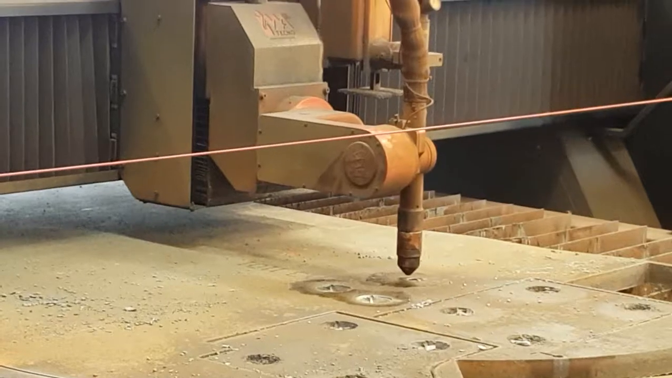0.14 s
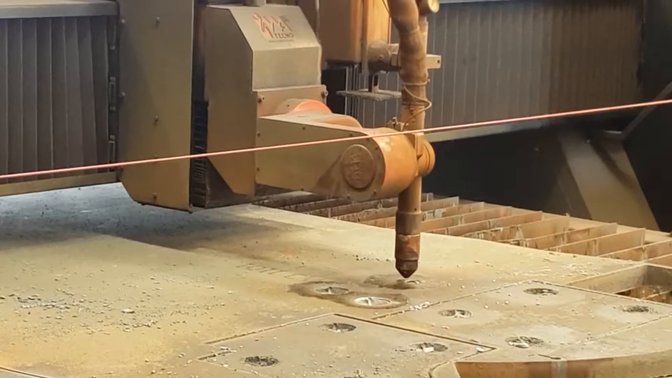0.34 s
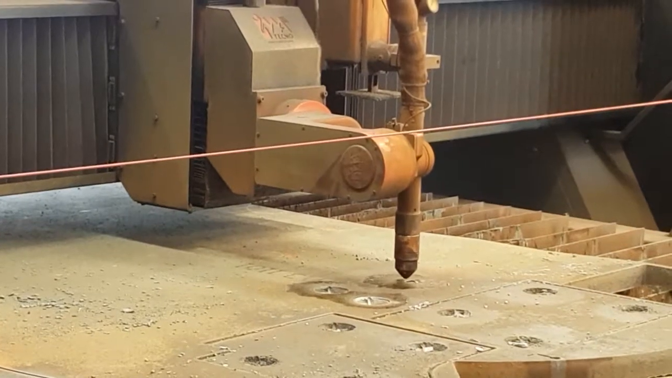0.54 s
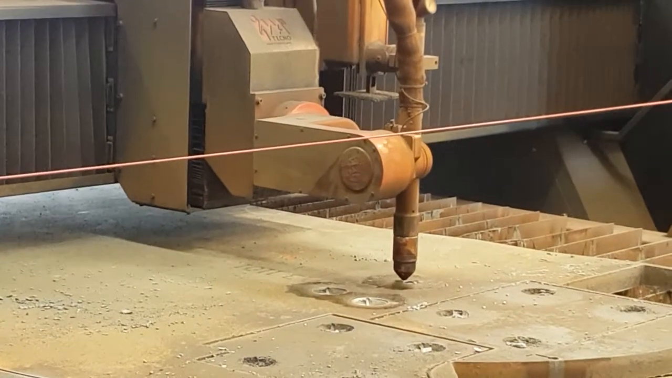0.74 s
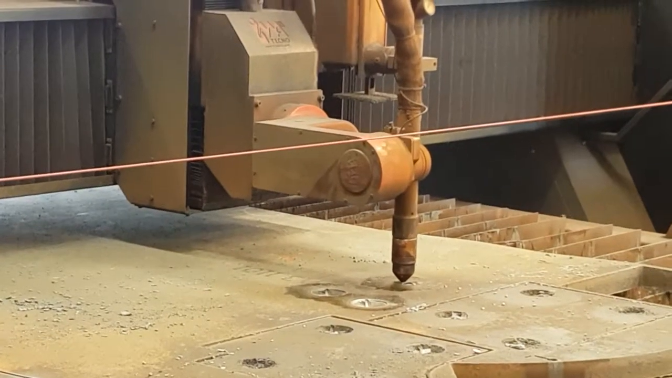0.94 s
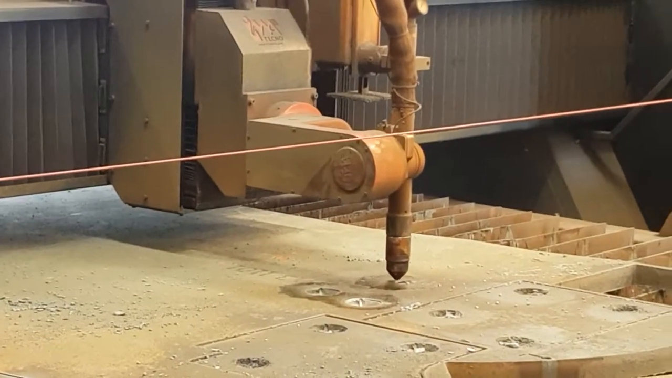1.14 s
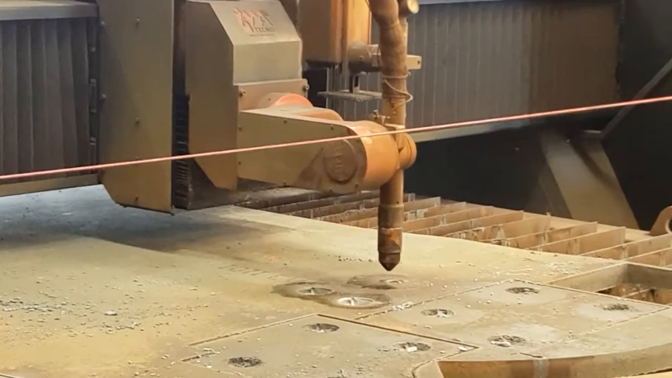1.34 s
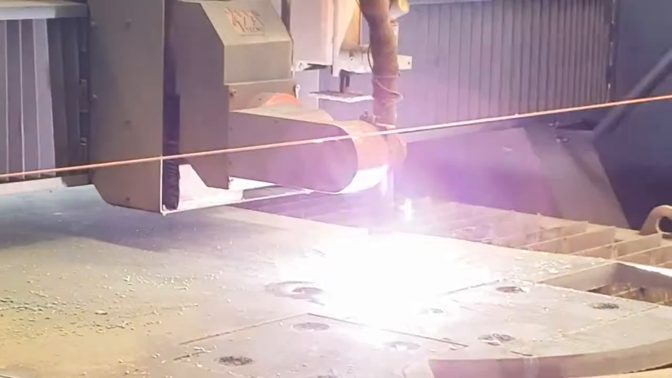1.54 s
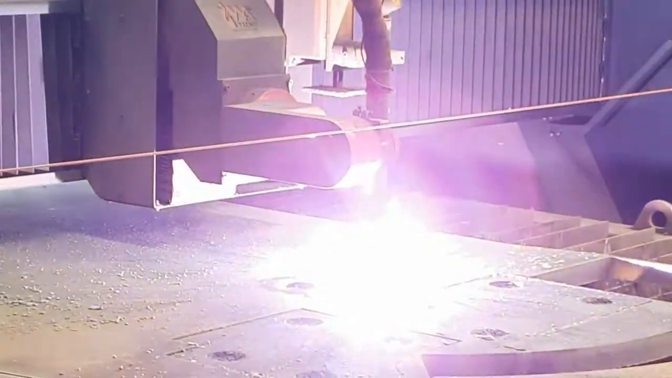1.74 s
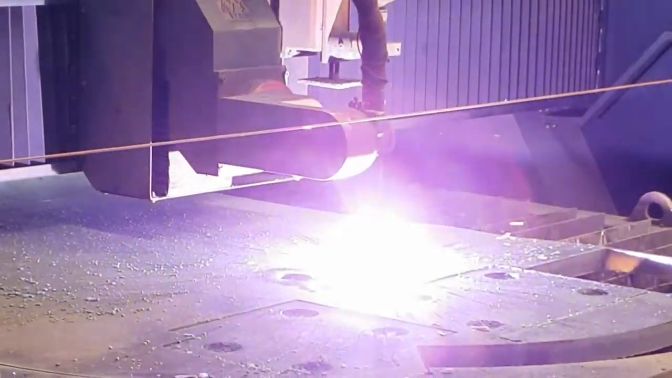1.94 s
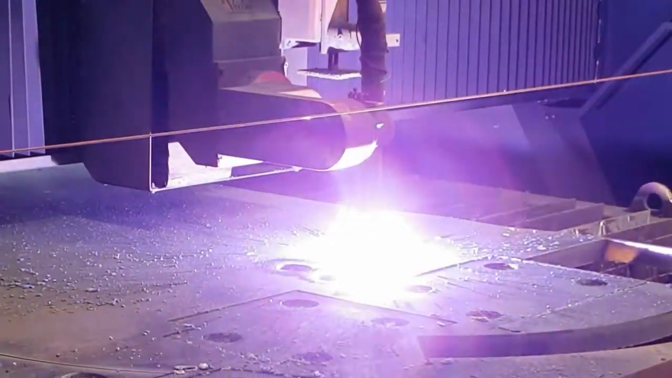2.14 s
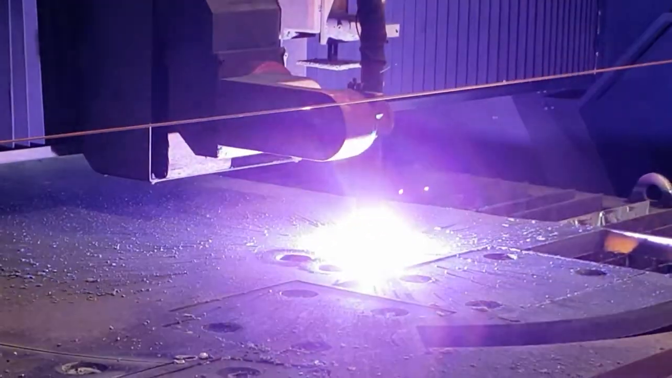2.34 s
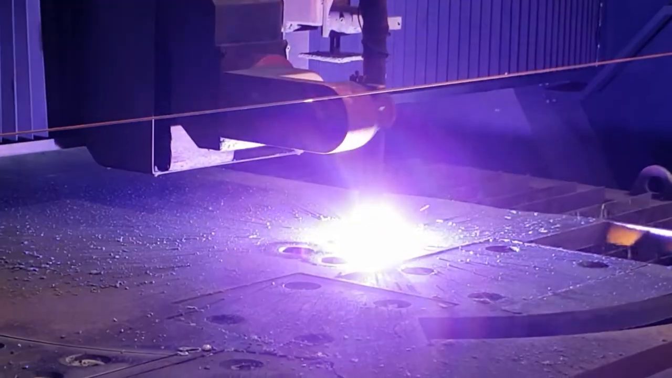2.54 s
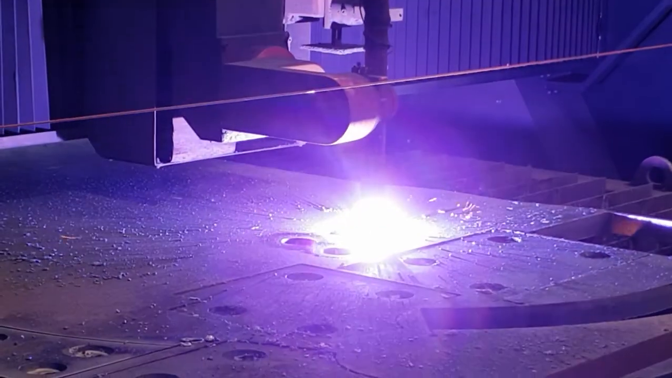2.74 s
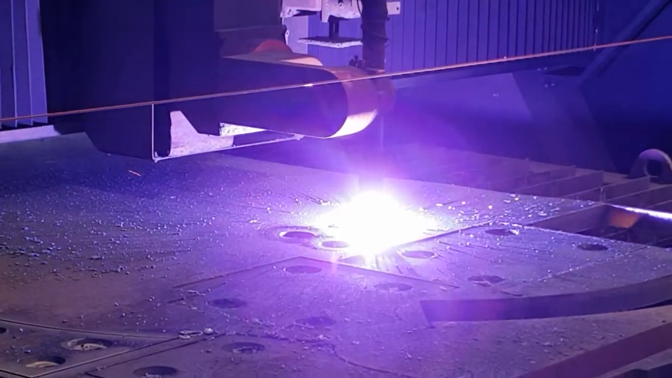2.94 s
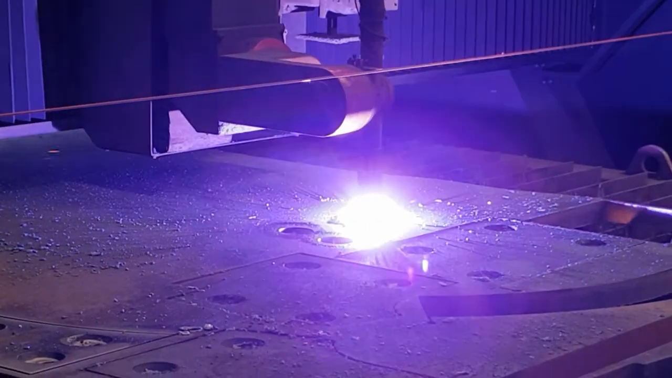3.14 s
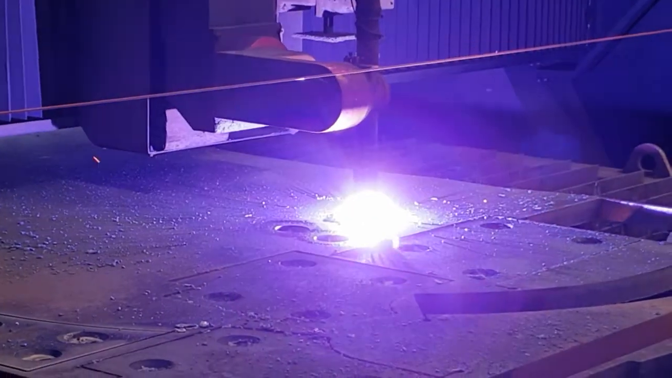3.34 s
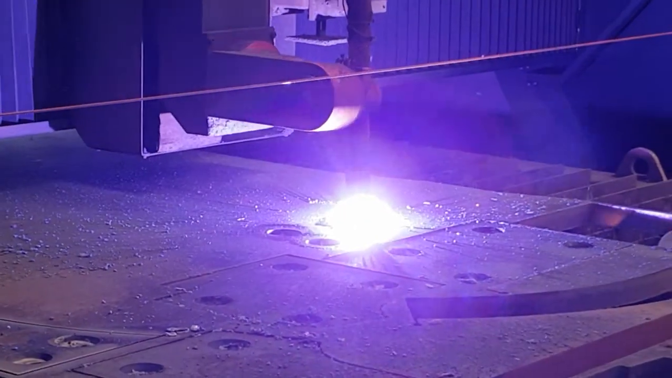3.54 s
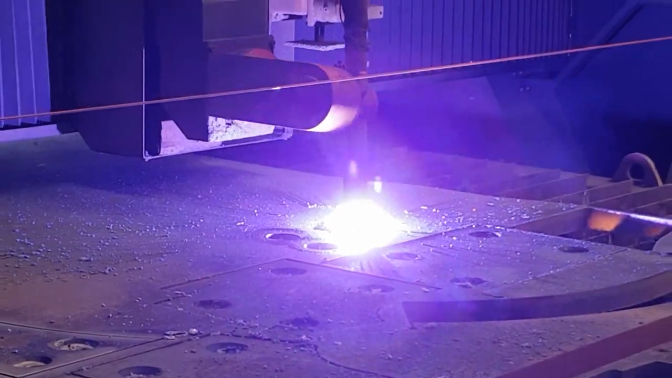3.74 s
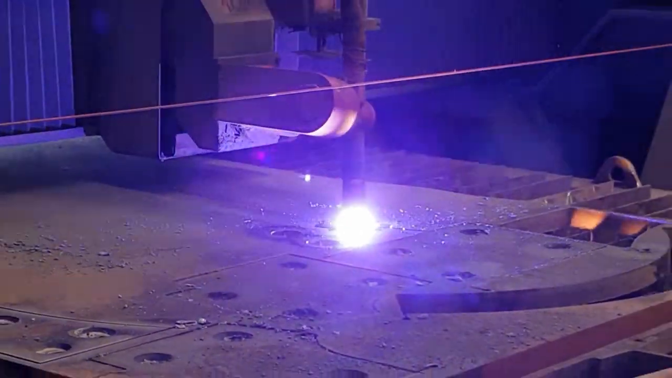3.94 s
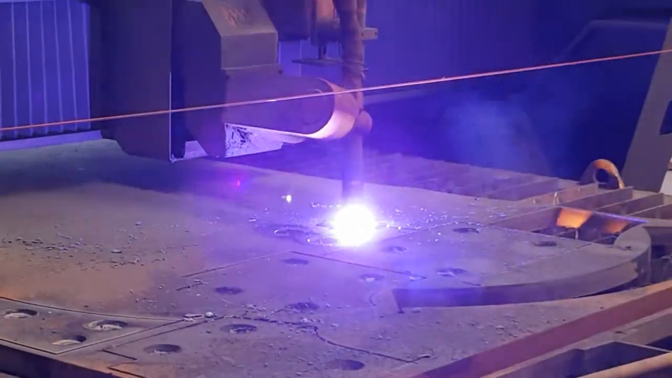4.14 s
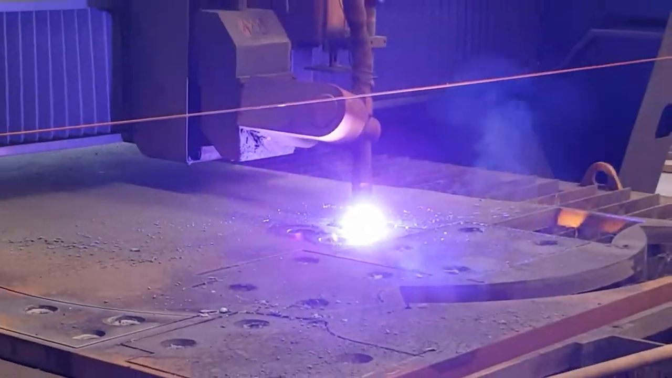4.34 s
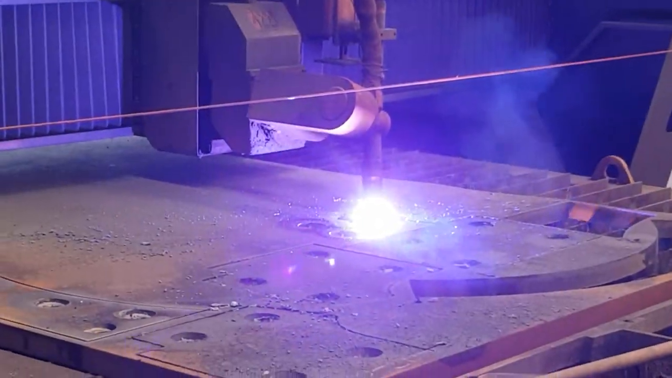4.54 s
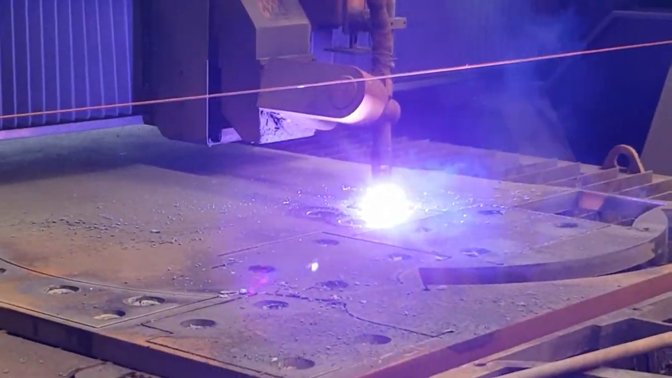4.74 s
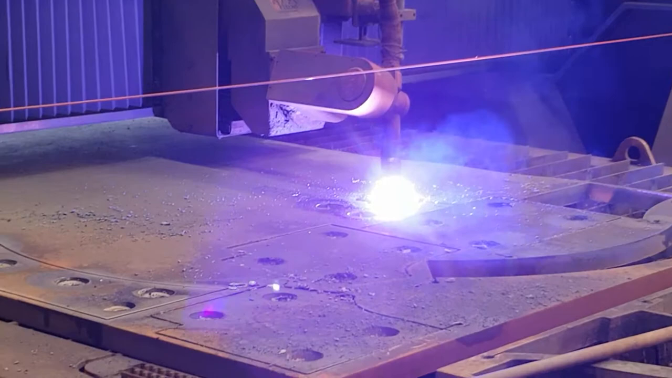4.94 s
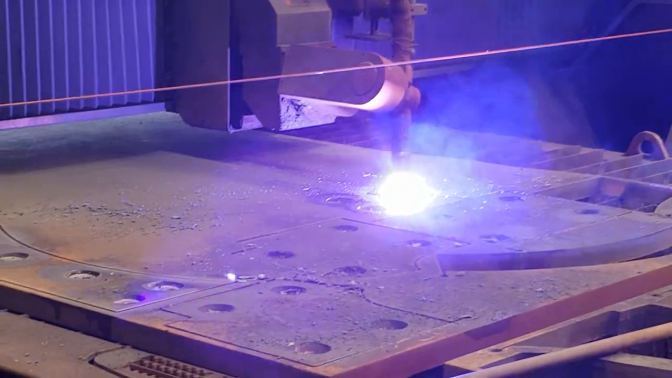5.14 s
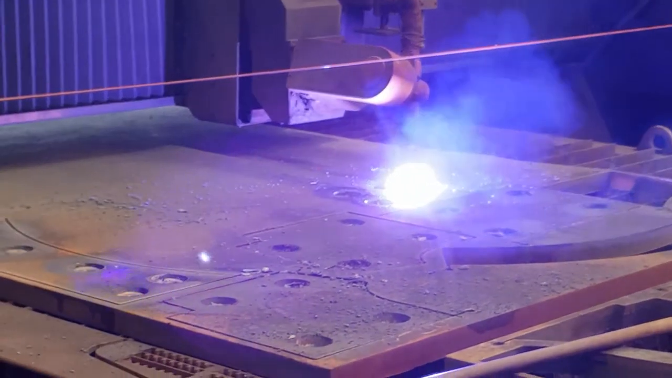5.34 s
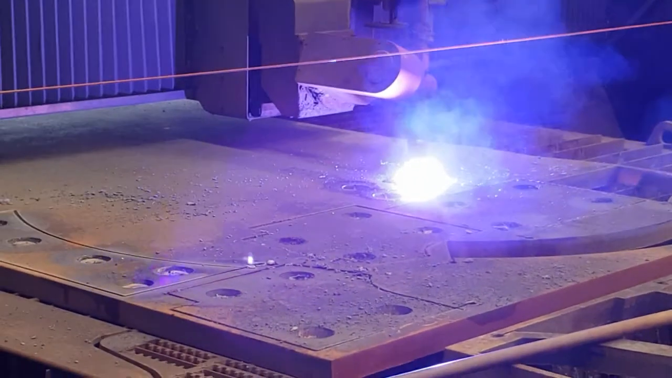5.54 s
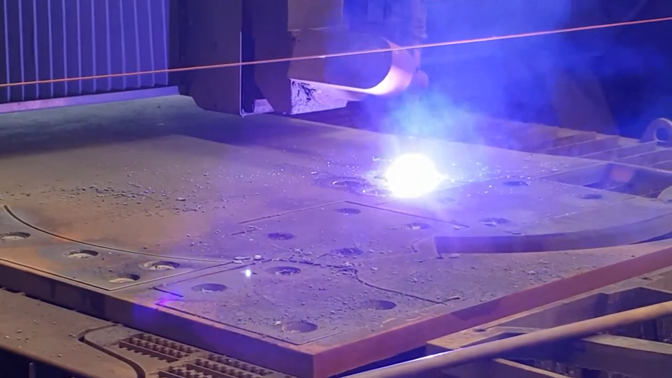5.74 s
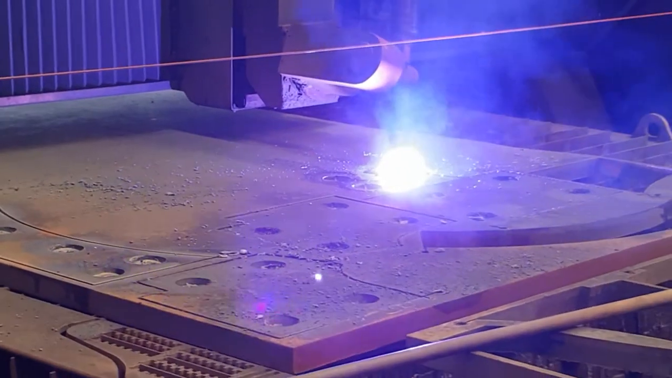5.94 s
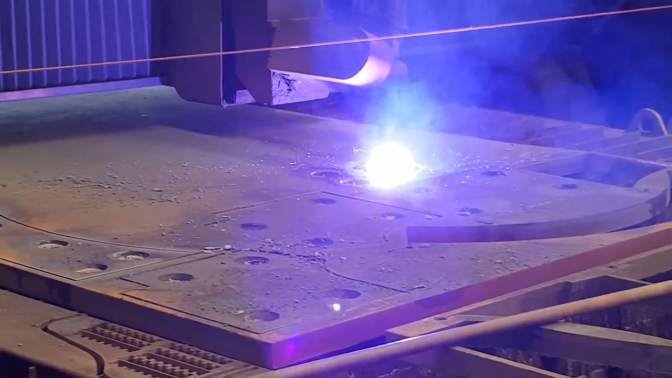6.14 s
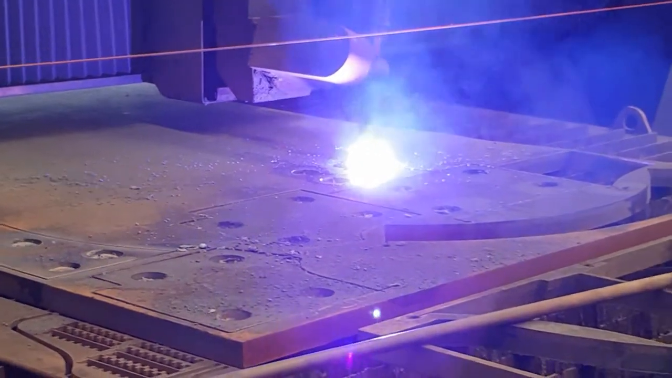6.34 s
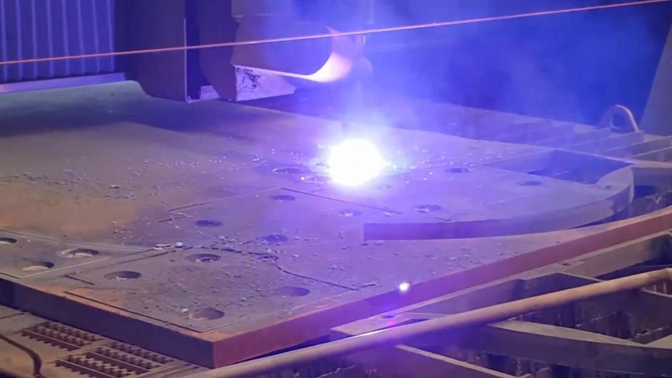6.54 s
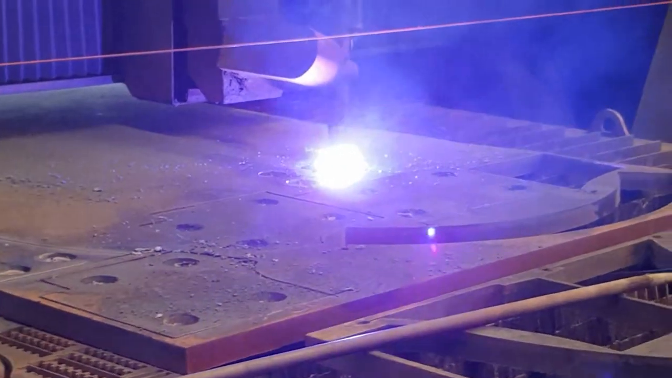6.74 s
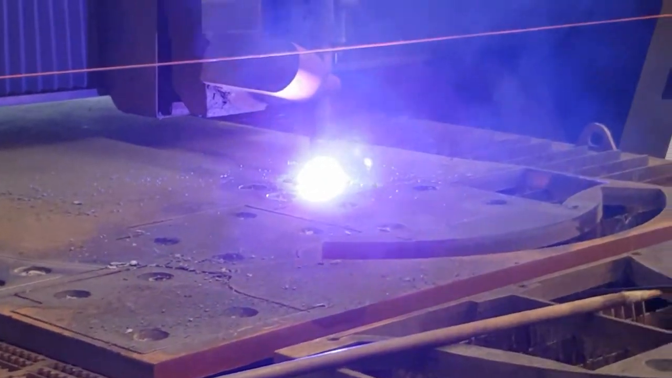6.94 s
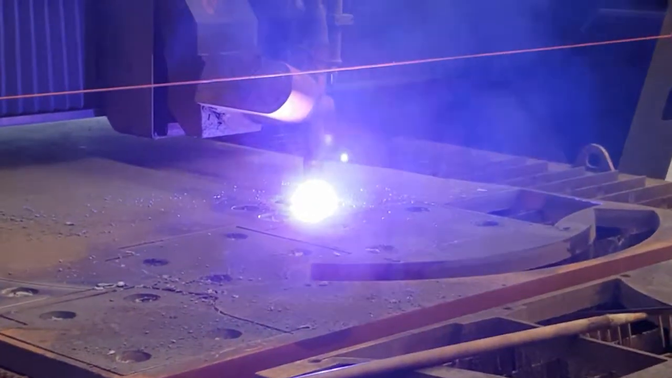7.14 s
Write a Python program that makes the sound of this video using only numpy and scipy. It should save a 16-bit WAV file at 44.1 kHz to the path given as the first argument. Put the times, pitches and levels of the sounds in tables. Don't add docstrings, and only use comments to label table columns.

```python
import sys
import numpy as np
from scipy import signal
from scipy.io import wavfile
from scipy.ndimage import uniform_filter1d, minimum_filter1d

SR = 44100
rng = np.random.default_rng(int(sys.argv[2]) if len(sys.argv) > 2 else 0)


def invert_db(x):
    u = np.asarray(x, float) / 20
    return 10 ** u


def transcribe(u):
    v = np.clip(np.atleast_2d(u).T, -1, 1)
    q = np.round(v * 32767).astype(np.int16)
    wavfile.write(sys.argv[1], SR, q)


N = 317079
HOP = 256
HZ = np.arange(2 * HOP + 1)[:, None] * SR / (4 * HOP)
TIME = np.arange(N // HOP + 2) * HOP / SR
STRIKE_S = 1.544
FAN_STOPS_S, FAN_STOP_FADE_S = 6.55, 0.03


def curve(table, s):
    at, *columns = np.transpose(table)
    return [np.interp(s, at, c) for c in columns]


def colour(points):
    hz, value = np.transpose(points)
    return np.interp(np.log(HZ + 1), np.log(hz), value)


def peak(hz, width_hz, db):
    return db / (1 + (2 * (HZ - hz) / width_hz) ** 2)


def walk(shape, span):
    x = rng.standard_normal(shape)
    for axis, k in enumerate(span):
        for _ in range(2):
            x = uniform_filter1d(x, max(int(k), 1), axis=axis)
    return x / x.std()


def ramp(s, at_s, rise_s):
    return np.clip((s - at_s) / rise_s, 0, 1)


def since_strike(s):
    return np.maximum(s - STRIKE_S, 0)


# f/Hz, likeness/0-1
LIKENESS = [(60, 1), (130, 0.96), (300, 0.91), (640, 0.83), (1400, 0.97), (3000, 0.82), (15000, 0.68)]
# f/Hz, level/dB
BALANCE = [(60, -10), (110, 1), (200, 0.5), (380, -1.5), (700, 0), (1290, -0.5), (2380, -1), (4400, 1.5),
           (8120, -2.5), (15000, 0.5)]


def hiss(shape_db, level_db, lo_hz, hi_hz, patchy_db, flicker_db, ripple_db, lag):
    grid = (len(HZ), len(TIME))
    band = (HZ >= lo_hz) & (HZ < hi_hz)
    shape = invert_db(shape_db + np.zeros(grid))
    shape = shape / np.sqrt(np.sum(band * shape ** 2, axis=0)) * invert_db(level_db)

    motion_db = patchy_db * walk(grid, (10, 25))
    motion_db = motion_db + flicker_db * walk(grid, (70, 3))
    motion_db = motion_db + ripple_db * walk(grid, (2, 70))
    shape = shape * invert_db(motion_db)

    mid, side = rng.standard_normal((2, *grid)) + 1j * rng.standard_normal((2, *grid))
    like = np.clip(colour(LIKENESS), 0, 1)
    mid = mid * np.sqrt(1 + like)
    side = side * np.sqrt(1 - like)

    turn_rad = np.clip(HZ / 1400, 0, 1) ** 2 * 1.9 * walk(grid, (3, 90))
    delay_rad = 2 * np.pi * HZ * lag / SR
    left = np.exp(1j * (turn_rad - delay_rad)) * invert_db(colour(BALANCE))
    pair = np.array([(mid + side) * left, mid - side]) * shape
    return invert_db(0.5) * signal.istft(pair, nperseg=4 * HOP, noverlap=3 * HOP)[1][:, :N]


def walls(x, t60_s, wet_db, channels):
    late_s = np.arange(SR // 2) / SR
    echo = rng.standard_normal((channels, len(late_s))) * invert_db(-60 * late_s / t60_s) * (late_s > 0.004)
    echo = invert_db(wet_db) * echo / np.sqrt(np.sum(echo ** 2, axis=1, keepdims=True))
    return signal.fftconvolve(x, echo, axes=1)[:, :N]


def ducked(s):
    duck_db, duck_s, sink_db_per_s, fan_stop_db = -13, 0.17, -0.6, -4
    since = since_strike(s)
    gain_db = duck_db * (1 - np.exp(-since / duck_s)) + sink_db_per_s * since
    return gain_db + fan_stop_db * ramp(s, FAN_STOPS_S, FAN_STOP_FADE_S)


# f/Hz, level/dB
SHOP_COLOUR = [(20, -40), (45, -21), (70, -14), (95, -6.5), (130, -4), (330, -3), (650, -8.5), (840, -11.5),
               (1050, -13), (1600, -27.5), (2500, -60)]
# f/Hz, level/dB
FAN_LINE = (338, -34)


def shop(s):
    rumble_db = -31
    fan_hz, fan_db = FAN_LINE
    blade_amp = invert_db(fan_db + ducked(s) + 0.79 * walk(N, [3000]))
    blade_hz = fan_hz + 2.44 * walk(N, [4000])
    blade = blade_amp * np.sin(2 * np.pi * np.cumsum(blade_hz) / SR)
    rumble = hiss(colour(SHOP_COLOUR), rumble_db + ducked(TIME), 60, 400,
                  patchy_db=0.4, flicker_db=0.3, ripple_db=1.2, lag=1.9)
    return blade + rumble


# t/s, level/dB
GAS = [
    (0, -24.5),
    (.4, -23.5),
    (.8, -24.5),
    (1.2, -22),
    (1.54, -22.5),
]
# f/Hz, level/dB per Hz
GAS_COLOUR = [(530, -17), (900, -22.5), (1660, -16.5), (2470, -10), (3070, -12.5), (3960, -8.5),
              (4920, -11), (5220, -8.5), (6030, -8), (7680, -22), (8660, -23.5), (9310, -24.5),
              (11700, -17), (14400, -18), (16000, -17)]
# f/Hz, width/Hz, level/dB
NOZZLE = [(2640, 300, 2.5), (3560, 73, 8.5), (4000, 230, 5), (5320, 180, 6.5), (6130, 60, 17),
          (6320, 28, 12), (9260, 100, 11)]


def gas():
    ring_db = colour(GAS_COLOUR) + sum(peak(*r) for r in NOZZLE)
    return hiss(ring_db, curve(GAS, TIME)[0], 1600, 8100,
                patchy_db=-0.5, flicker_db=1.13, ripple_db=-3.0, lag=13.3)


# t/s, level/dB
JET = [(1.54, -31), (1.6, -17), (1.75, -16.5), (2.15, -21.5), (2.5, -23), (3.3, -24), (3.75, -20),
       (4.6, -22.5), (5.25, -22.5), (6.2, -21), (6.5, -23.5), (7.19, -25)]
# f/Hz, level/dB
JET_COLOUR = [(180, -30), (300, -21), (500, -16.5), (690, -8), (885, -14.5), (1060, -10), (1660, -11),
              (2740, -6), (3190, -7.5), (5900, -1), (7080, -11), (7950, -24.5), (10200, -13), (12000, -8.5),
              (16000, -15.5)]
LAYER_HZ = (700, 2800, 4300, 12000)
LAYER_STEADY = (0.74, 0.44, 0.19, 0.7)
LAYER_TRAVEL = (0.26, 0.12, -0.012, 0.034)
FRESH = (-4, 6.5, 8.5, 12)
PUDDLE = (5, 6, -2.5, 5)
# f/Hz, width/Hz, level/dB
BOOM_STOP = (380, 500, -7)
# f/Hz, width/Hz, level/dB, loudest t/s, lasts/s
POCKETS = [(2520, 440, 8, 1.55, .07), (4080, 730, 5.5, 1.75, 0.38), (3620, 53, 12.5, 1.98, 0.63),
           (1010, 65, 5.5, 2.5, 1.7), (1323, 47, 15, 3.74, 0.92), (1080, 103, 3.5, 4.3, .4),
           (740, 24, 8.5, 4.65, 3.1), (4700, 540, 5, 3.85, 0.65), (654, 154, 7, 5.5, 0.58),
           (2000, 90, 2.5, 5.5, 0.47), (12700, 620, 5.5, 4.76, 0.33), (14330, 690, 9.5, 4.98, 0.19),
           (5670, 64, 6, 5.78, .08), (4390, 60, 11, 5.7, 0.23), (2730, 570, 7.5, 6.83, .4),
           (12250, 520, 3, 6.8, 0.39)]


def jet():
    fresh_s, puddle_s = 0.064, 0.31
    effort_db = curve(JET, TIME)[0]
    since = since_strike(TIME)
    layers_db = np.outer(LAYER_TRAVEL, TIME - TIME.mean())
    layers_db = layers_db - np.outer(LAYER_STEADY, effort_db - effort_db.mean())
    layers_db = layers_db + np.outer(FRESH, np.exp(-since / fresh_s))
    layers_db = layers_db + np.outer(PUDDLE, np.exp(-since / puddle_s))
    share = np.hstack([colour(list(zip(LAYER_HZ, row))) for row in np.eye(4)])

    boom_db = peak(*BOOM_STOP) * ramp(TIME, FAN_STOPS_S, FAN_STOP_FADE_S)
    pockets_db = 0
    for hz, width_hz, db, at_s, lasts_s in POCKETS:
        pockets_db = pockets_db + peak(hz, width_hz, db) * np.exp(-((TIME - at_s) / lasts_s) ** 2)
    kerf_db = peak(curve(WHISTLE, TIME)[0] + 260, 670, 2.6) * (TIME > WHISTLE[0][0])

    roar_db = colour(JET_COLOUR) + share @ layers_db + boom_db + pockets_db + kerf_db
    return hiss(roar_db, effort_db, 3200, 5200,
                patchy_db=0.5, flicker_db=0.85, ripple_db=1.6, lag=3.03)


# t/s, f/Hz, level/dB
WHISTLE = [(1.8, 5760, -34), (1.98, 5520, -35), (2.02, 5430, -22), (2.2, 5390, -15), (2.24, 5500, -14),
           (2.36, 5390, -15), (2.55, 5412, -14.5), (2.67, 5450, -16), (2.78, 5550, -9.5), (2.85, 5560, -11),
           (2.91, 5860, -20), (3.06, 5885, -11.5), (3.15, 5927, -13.5), (4.0, 6043, -15.5),
           (5.0, 6075, -12), (5.8, 6138, -18.5), (6.6, 6163, -22.5), (7.19, 6170, -15.5)]
# t/s, level/dB, lasts/s
SURGES = [(2.076, 0, 0.017), (2.532, 9, 0.047), (2.33, -6, .03), (2.804, -1, .03), (2.846, -8, 0.014),
          (3.004, 5, .06), (3.09, -8.5, 0.031), (3.42, -12, 0.015), (3.453, 5, .03), (3.944, -12, 0.037),
          (4.57, -4, 0.12), (5.0, 5, 0.058), (5.138, -7.5, 0.071), (5.454, -40, 0.016), (5.55, 12, 0.018),
          (5.66, -7.5, 0.071), (5.85, 6, 0.03), (6.1, 2, 0.096), (6.238, -20, .03), (6.307, 13, .02),
          (6.418, -2, 0.029), (6.495, 14, 0.017)]


def whistle(s):
    wobble_hz, jitter_hz, flutter_db, scatter = 11, 15, 2.6, 0.34
    pierce_start_s, pierce_end_s, through_s = 1.9, 2.72, 2.95
    pierce_octave_db, cut_octave_db = -27, -46
    hz, tone_db = curve(WHISTLE, s)
    for at_s, db, lasts_s in SURGES:
        tone_db = tone_db + db * np.exp(-((s - at_s) / lasts_s) ** 2)
    blind = ramp(s, pierce_start_s, 0.3) - ramp(s, pierce_end_s, 0.04)
    octave_db = cut_octave_db + (pierce_octave_db - cut_octave_db) * blind

    waver = np.where(s < through_s, 1.8, 1)
    pitch_hz = hz + wobble_hz * walk(N, [1200]) + waver * jitter_hz * walk(N, [150])
    phase = 2 * np.pi * np.cumsum(pitch_hz) / SR
    tone = invert_db(tone_db) * np.exp(1j * phase) + invert_db(octave_db) * np.exp(2j * phase)
    tone = tone * invert_db(waver * flutter_db * walk(N, [450])) * ramp(s, WHISTLE[0][0], 0.14)

    direct = invert_db(np.array([[0.7], [-1.3]])) * np.array([[-1j], [1]])
    paths = scatter * (walk((2, N), [1, 900]) + 1j * walk((2, N), [1, 900]))
    near = np.real(tone * (direct + paths))
    return near + walls(near, 0.4, wet_db=-9.0, channels=2)


def scene():
    strike_rise_s, strike_db, strike_fade_s = 0.004, 12, 0.015
    s = np.arange(N) / SR
    arc = ramp(s, STRIKE_S, strike_rise_s)
    spit = invert_db(strike_db * np.exp(-since_strike(s) / strike_fade_s))
    air = gas() * (1 - arc) + jet() * arc * spit
    return shop(s) + air + walls(air, 0.35, wet_db=-13.0, channels=1) + whistle(s)


def band_limit(x):
    return signal.sosfilt(signal.butter(12, 16410, fs=SR, output="sos"), x)


def record(dry):
    bass_cut = signal.butter(2, 38, "highpass", fs=SR, output="sos")
    top_cut = signal.ellip(12, 0.2, 70, 15760, fs=SR, output="sos")
    x = signal.sosfilt(bass_cut, dry)
    room_left = np.minimum(1, 0.93 / np.maximum(np.abs(x).max(axis=0), 1e-9))
    gain = uniform_filter1d(minimum_filter1d(room_left, size=129), size=129)
    mix = signal.sosfilt(top_cut, x * gain)
    return band_limit(mix)


dry = scene()
out = record(dry)
transcribe(out)
```